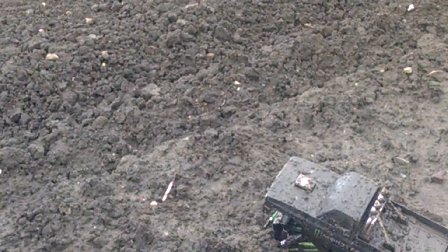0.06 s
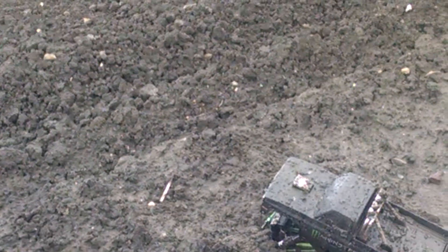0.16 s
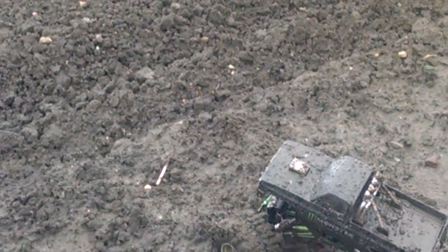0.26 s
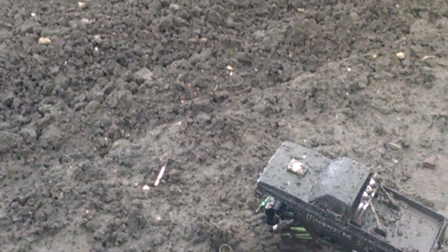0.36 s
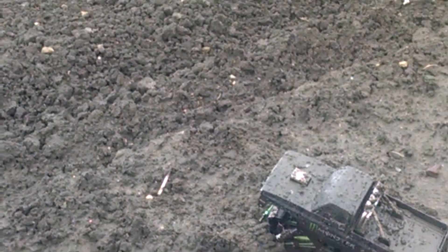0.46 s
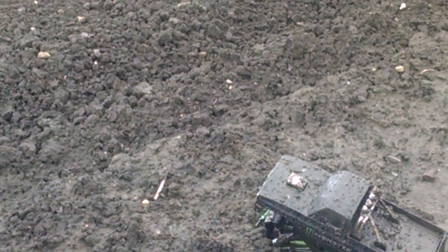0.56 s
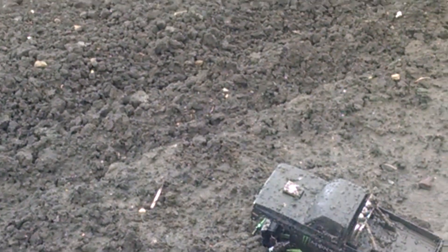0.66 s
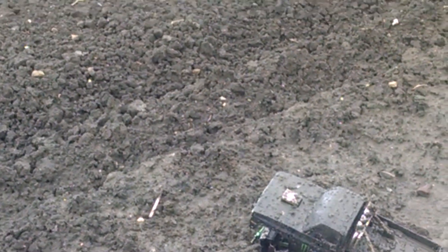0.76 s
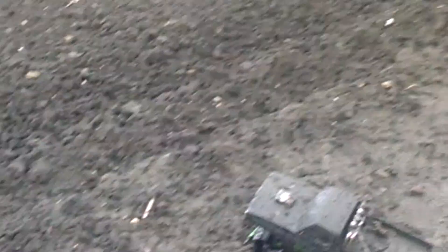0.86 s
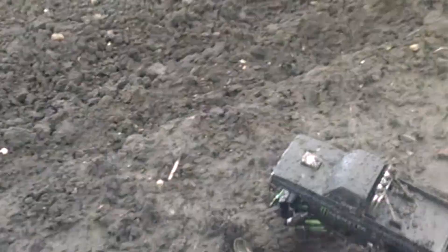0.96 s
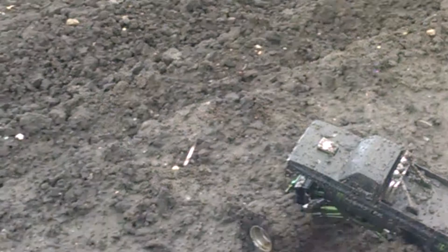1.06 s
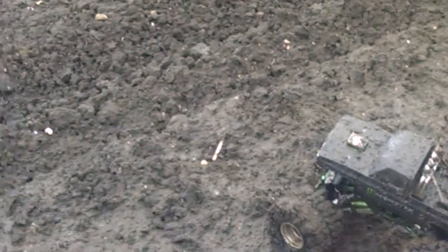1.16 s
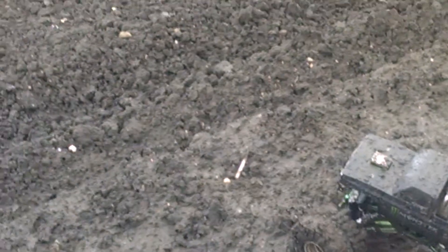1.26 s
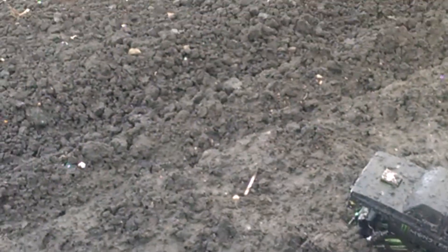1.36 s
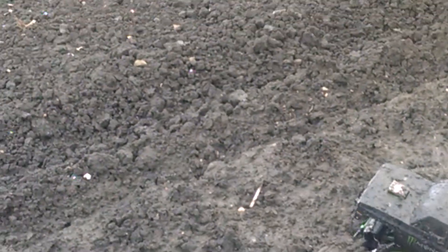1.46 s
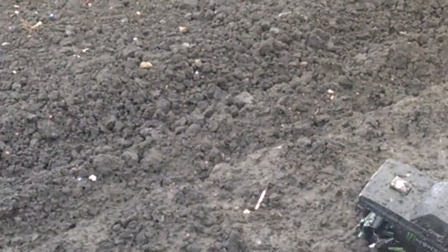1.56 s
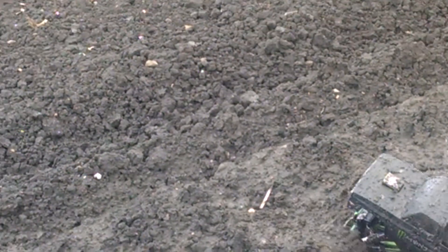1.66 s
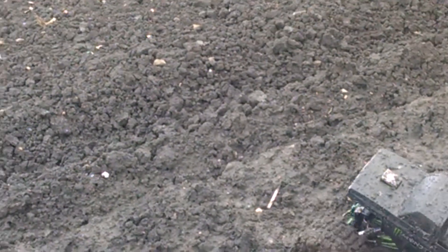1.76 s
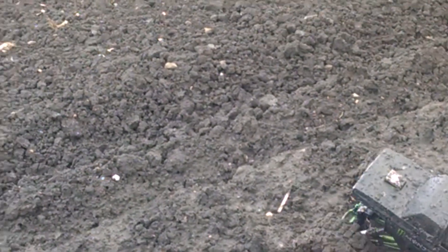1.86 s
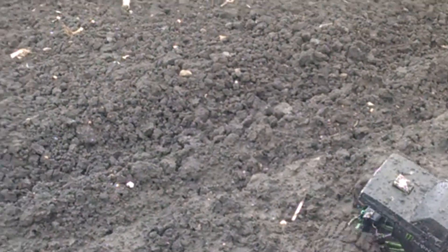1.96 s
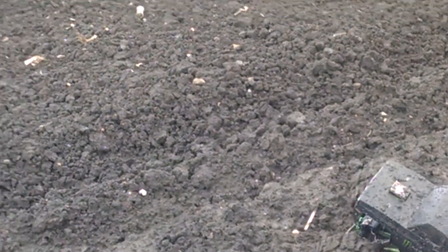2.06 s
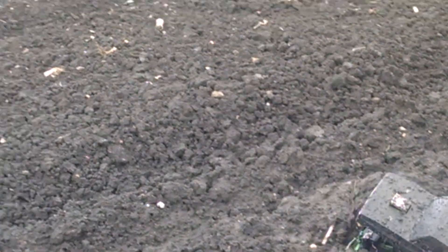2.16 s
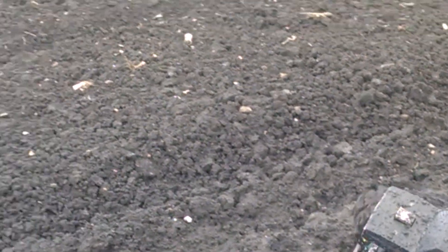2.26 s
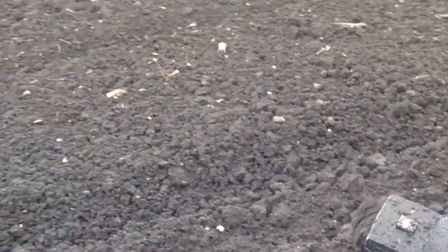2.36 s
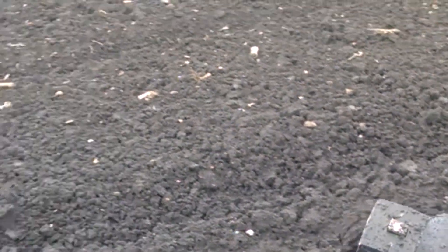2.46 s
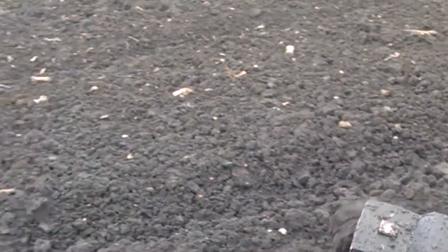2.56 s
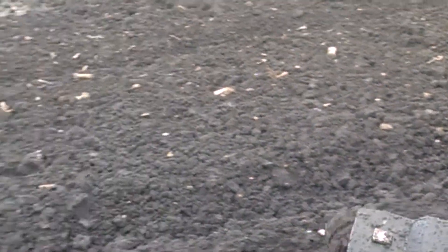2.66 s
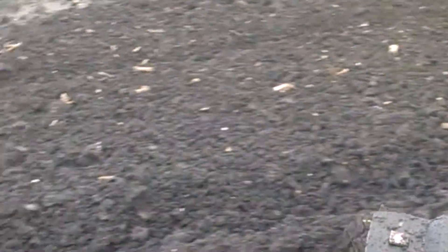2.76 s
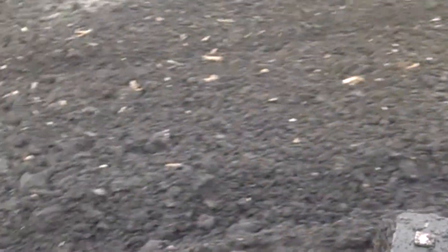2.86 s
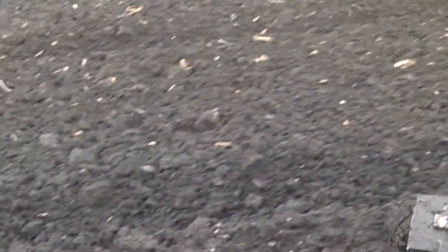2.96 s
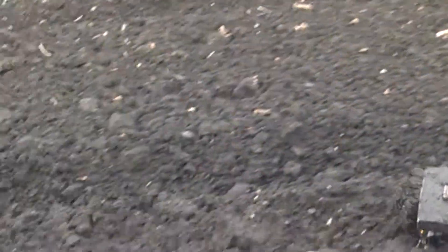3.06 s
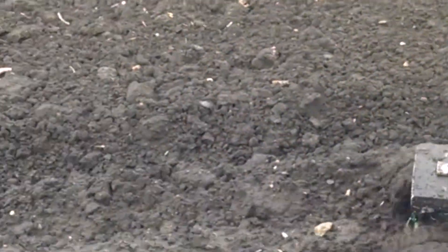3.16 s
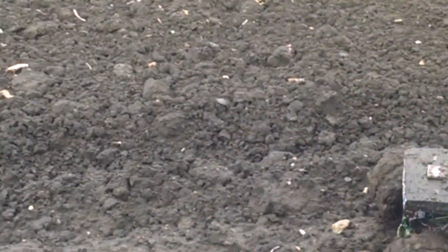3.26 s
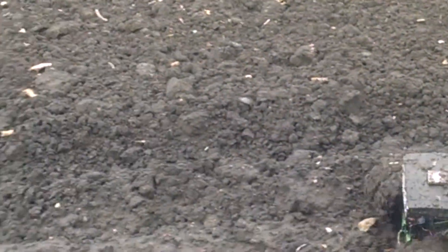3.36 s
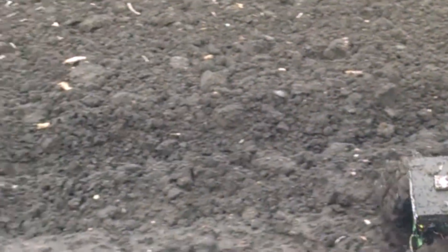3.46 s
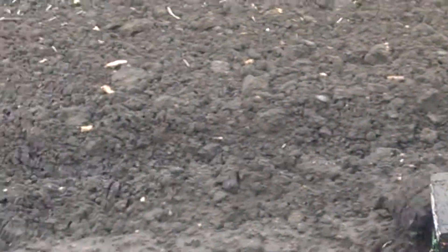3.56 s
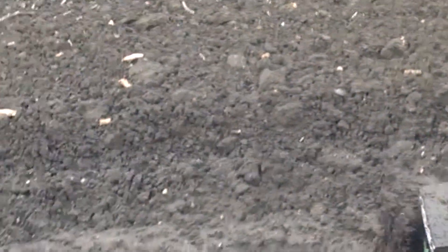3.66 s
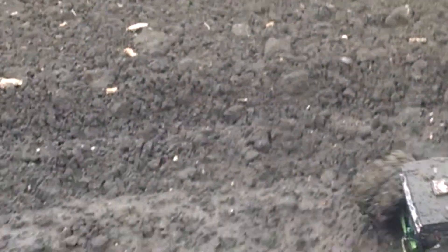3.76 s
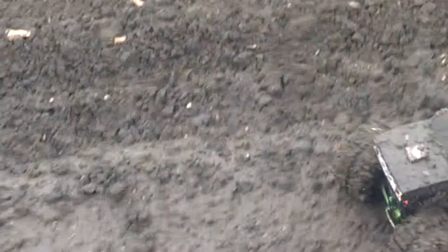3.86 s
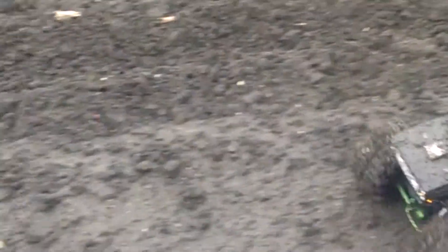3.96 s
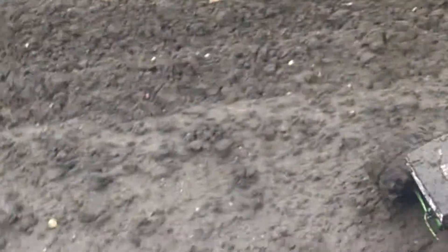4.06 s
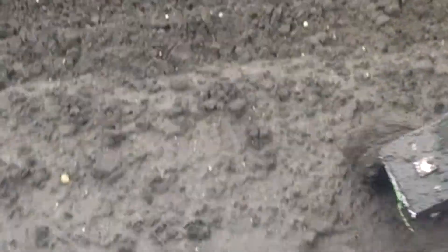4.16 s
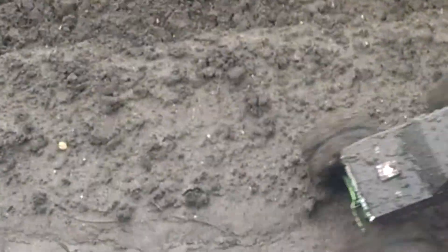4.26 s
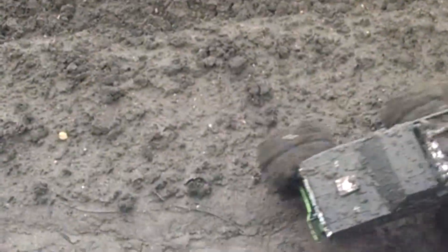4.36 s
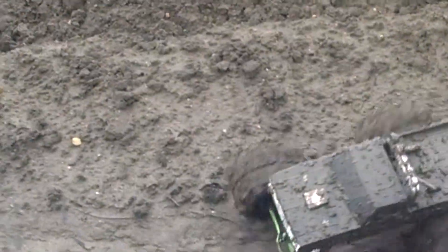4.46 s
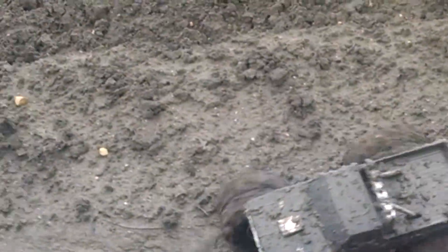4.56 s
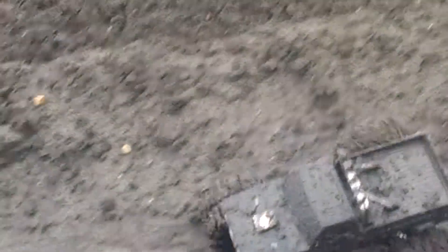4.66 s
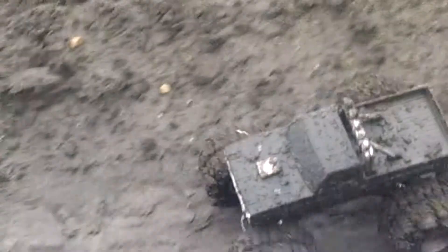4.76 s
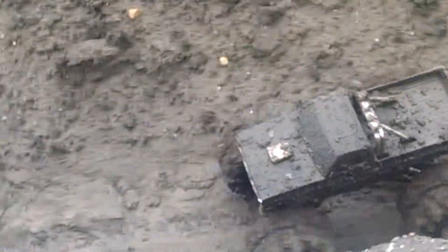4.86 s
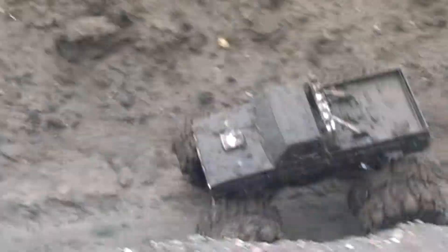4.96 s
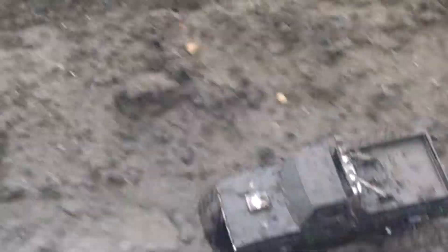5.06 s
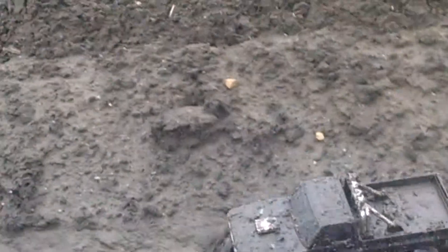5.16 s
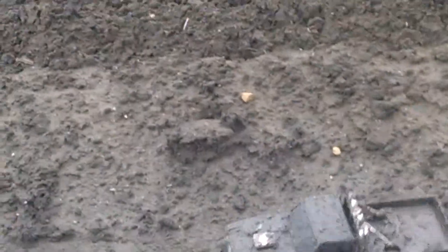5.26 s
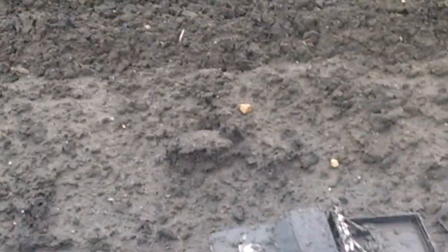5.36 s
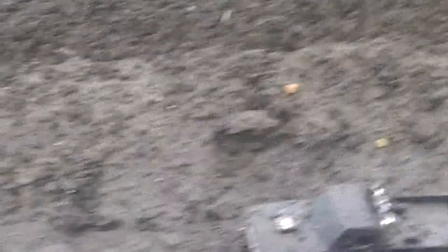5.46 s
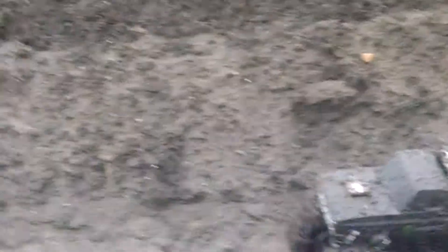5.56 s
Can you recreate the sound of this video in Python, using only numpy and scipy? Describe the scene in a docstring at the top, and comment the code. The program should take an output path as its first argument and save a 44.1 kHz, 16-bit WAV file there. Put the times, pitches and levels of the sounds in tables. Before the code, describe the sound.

Small electric motor and rattling plastic gears start up, climb to a rough shrill whine over crunching soil, then sag unsteadily.

```python
"""A toy truck stands on wet soil, then drives off close to a handheld stereo microphone.
Its gears whine and rattle: tones follow the gear pitch, and random clicks in noise are filtered into rattle.
Motor brushes hiss, the speed controller whistles, tyres crunch in the mud, and damped rings make clicks.
A servo chirps; wind rumble and pops reach the right capsule, over an open-air hush with a hum.
Each side has a delayed copy of the other taken off, then a limiter and a treble cut follow."""
import sys
import numpy as np
from scipy import signal
from scipy.fft import rfft, irfft, next_fast_len
from scipy.io import wavfile
from scipy.ndimage import uniform_filter1d

SR = 44100
rng = np.random.default_rng(int(sys.argv[2]) if len(sys.argv) > 2 else 0)


def file_out(sig):
    """Save sig as 16-bit WAV at sys.argv[1]."""
    # one column per channel
    cols = np.atleast_2d(sig).T
    # limit, then scale
    lim = np.clip(cols, -1, 1)
    pcm = np.round(lim * 32767).astype(np.int16)
    wavfile.write(sys.argv[1], SR, pcm)


N = 247401  # length in samples

# All levels are those going into the body, the limiter and the other steps further on.
# Pitch of the meshing gear teeth, dipping as the wheels bog and rising as they break free.
# Each row: time in seconds, pitch in Hz, then the levels of fundamental, octave and third partial in dB.
GEAR_PITCH = [(1.35, 483.0, -69, -79, -72.5), (1.4, 542.0, -75, -40, -66), (1.43, 485.0, -47, -59, -70.5),
              (1.46, 464.0, -54, -78, -68), (1.5, 460.0, -51, -69.5, -62), (1.55, 424.0, -66, -71.0, -52),
              (1.585, 466.0, -45.5, -64, -71), (1.62, 579.0, -53, -54, -44), (1.66, 437.0, -58, -68, -65),
              (1.7, 560.0, -57, -50, -63), (1.74, 529.0, -66, -50, -49), (1.78, 492.0, -42, -73, -51),
              (1.81, 485.0, -49, -74, -50), (1.854, 645.0, -35, -42, -43),
              (1.9, 652.0, -35.5, -39.5, -64.0), (1.94, 567.0, -43, -56, -48), (1.98, 625.0, -60, -55, -62),
              (2.02, 641.0, -36, -37, -65.5), (2.05, 753.0, -31, -56, -52.5),
              (2.1, 783.0, -37.5, -38, -64.5), (2.155, 840.0, -40.5, -36.5, -61.5),
              (2.185, 1151.0, -35, -49, -47), (2.216, 1060.0, -43, -52.5, -54),
              (2.24, 1284.0, -30.5, -53.0, -42), (2.29, 1270.0, -29, -57.5, -42),
              (2.335, 1330.0, -36, -48, -50), (2.376, 1510.0, -44, -37, -50),
              (2.415, 1450.0, -46, -33, -65.0), (2.44, 1440.0, -50, -46, -65.0),
              (2.465, 1540.0, -43, -46, -63.5), (2.5, 1570.0, -56, -38, -63.5),
              (2.53, 1500.0, -44, -35, -57.5), (2.562, 1380.0, -39, -35, -55),
              (2.584, 1078.0, -40, -48, -50), (2.636, 1140.0, -41.5, -58, -48.5),
              (2.668, 1400.0, -41.0, -44, -63.0), (2.685, 1200.0, -36, -48, -64.5),
              (2.71, 1216.0, -36.5, -44, -64.0), (2.758, 962.0, -43, -46, -55.5),
              (2.805, 1309.0, -39, -42, -56.0), (2.865, 1145.0, -39, -42, -55),
              (2.926, 1060.0, -39.5, -42, -36), (2.965, 924.0, -43, -46, -59.5),
              (3.0, 1076.0, -37.5, -42, -41), (3.02, 909.0, -44, -45, -58), (3.055, 995.0, -38, -42, -37),
              (3.086, 926.0, -45, -44, -57.5), (3.114, 1383.0, -36, -44, -50),
              (3.14, 1307.0, -35.5, -52, -53), (3.17, 874.0, -54, -48, -48), (3.2, 985.0, -43, -33, -46),
              (3.23, 859.0, -49, -45, -60.5), (3.27, 1025.0, -53, -34, -48.0),
              (3.31, 1000.0, -51, -36, -60.0), (3.336, 1090.0, -46.0, -34, -46),
              (3.358, 974.0, -48, -42, -40), (3.41, 947.0, -41.5, -40.5, -58.5),
              (3.46, 1341.0, -46, -29, -56), (3.5, 1031.0, -46, -50, -44), (3.53, 1223.0, -47, -52, -61.5),
              (3.58, 942.0, -38, -41, -58.0), (3.62, 1116.0, -51, -59, -57),
              (3.66, 1316.0, -47, -29, -41.5), (3.72, 1328.0, -46, -37, -41),
              (3.77, 1154.0, -45, -69.0, -36), (3.81, 1035.0, -67, -41, -41),
              (3.845, 1299.0, -46, -51, -45), (3.87, 1472.0, -41.5, -43, -50),
              (3.91, 1381.0, -57, -36, -67.0), (3.94, 1507.0, -42, -51, -63.5),
              (3.97, 1061.0, -51, -73.5, -43), (4.01, 1214.0, -43.5, -69.0, -53),
              (4.045, 1483.0, -49, -42, -65.0), (4.08, 1374.0, -45, -76, -71.5),
              (4.11, 1431.0, -60, -70.0, -64.5), (4.15, 1450.0, -45, -64.5, -64.0),
              (4.18, 1600.0, -52, -52, -52.0), (4.21, 1640.0, -52, -33, -40),
              (4.25, 2040.0, -37, -50, -60.0), (4.28, 1600.0, -50, -36, -52.5),
              (4.3, 1740.0, -48, -38, -62.5), (4.33, 1600.0, -50, -42, -63.0),
              (4.36, 1856.0, -57, -59, -52), (4.387, 2173.0, -42, -40, -37.0),
              (4.41, 1800.0, -43, -42, -50.0), (4.44, 1780.0, -44, -37, -61.0),
              (4.47, 1429.0, -50, -50, -61.0), (4.5, 1250.0, -43.5, -52.5, -62.5),
              (4.53, 1776.0, -70, -50, -51.0), (4.56, 1620.0, -65, -41, -64.5),
              (4.6, 1428.0, -44, -44, -74), (4.625, 1350.0, -55, -51, -57),
              (4.665, 1802.0, -49, -49.0, -39), (4.69, 1504.0, -41, -36, -61.0),
              (4.71, 1103.0, -53, -60.5, -55), (4.75, 1149.0, -50, -64.5, -64),
              (4.8, 1200.0, -62, -41, -44), (4.84, 1614.0, -42, -42.5, -37),
              (4.875, 1102.0, -45.5, -62.0, -48), (4.912, 1672.0, -61, -45, -58),
              (4.935, 1370.0, -33, -52, -51.5), (4.952, 1146.0, -42, -67, -57),
              (4.99, 1299.0, -73, -74, -63.5), (5.02, 955.0, -66.0, -41, -76),
              (5.05, 715.0, -37.5, -42.5, -71), (5.08, 922.0, -55, -48, -64.5),
              (5.12, 1133.0, -49, -47, -48), (5.145, 975.0, -41, -40, -60.5),
              (5.17, 786.0, -48, -55, -65.0), (5.2, 933.0, -42, -39, -64.5), (5.225, 1015.0, -47, -40, -57),
              (5.264, 647.0, -48, -58, -54), (5.3, 675.0, -41, -51.5, -49), (5.33, 685.0, -50, -46, -55),
              (5.37, 720.0, -60, -53.0, -57), (5.4, 650.0, -51, -68, -51), (5.43, 610.0, -41, -58, -42),
              (5.455, 640.0, -60, -50, -62.5), (5.48, 878.0, -49, -35.5, -57),
              (5.512, 588, -35.5, -49, -44), (5.535, 732.0, -48, -48, -46), (5.555, 770.0, -49, -41, -65),
              (5.585, 645.0, -46, -42, -47), (5.61, 703.0, -44, -50, -46)]
INERTIA_S = .012  # the pitch is averaged over this time
# While the wheels lack grip, two more gear trains hunt about the first at random.
# Each row: time in seconds, distance as a share of the pitch, level in dB against the first.
HUNTING_TRAINS = [(1.35, .25, -5), (1.8, .25, -6), (1.85, .05, -24), (3.7, .05, -24), (3.85, .2, -10),
                  (4.1, .2, -5), (5.0, .2, -5), (5.15, .22, -12), (5.3, .2, -15), (5.61, .15, -15)]
# Upper partials of the mesh, a growl at low speed. Each row: time in seconds, level in dB.
GROWL_LEVEL = [(1.35, -57), (1.4, -52), (1.48, -61), (1.53, -54), (1.7, -55), (1.87, -51), (2.0, -52),
               (2.12, -58), (2.25, -75), (5.0, -75), (5.15, -58), (5.61, -57)]
# Each entry: growl pitch as a multiple of the mesh pitch.
GROWL_MULTIPLES = (2.5, 3.5, 4, 5, 6, 7)
OVERTONE_FLICKER_DB = 4
DULL_HZ, DULL_WIDTH_HZ, DULL_DB = 2450, 280, -10  # the shell passes little of the overtones here
# Rough tones about where the gear case rings. Each entry: pitch in Hz.
STRAND_PITCHES = (1900, 2950, 3050, 3180, 3300, 3450, 3600, 3800, 4000)
STRAND_DB, STRAND_WANDER = -14, .045  # dB against the rattle; share of the pitch

# Motor effort, heard as brush hiss. Each row: time in seconds, level in dB.
EFFORT = [(1.32, -117), (1.334, -48.5), (1.396, -37), (1.485, -53), (1.528, -39.5), (1.585, -45.5),
          (1.72, -41.5), (1.82, -41), (1.87, -36), (1.97, -40.5), (2.01, -38), (2.14, -34), (2.35, -29),
          (2.55, -31), (2.61, -36), (2.68, -34), (3.09, -32.5), (3.115, -26.5), (3.17, -32.5), (3.6, -31.5),
          (4.05, -29.5), (4.1, -36), (4.126, -23.5), (4.16, -31), (4.19, -27), (4.36, -28), (4.392, -26.5),
          (4.47, -28.5), (4.67, -29), (4.815, -32.5), (4.84, -25.5), (4.876, -30), (4.932, -26.5),
          (4.96, -31.5), (5.01, -29), (5.058, -36.5), (5.11, -28), (5.176, -36), (5.206, -30.5),
          (5.3, -40.5), (5.35, -36), (5.45, -42), (5.478, -34), (5.506, -40.5), (5.55, -36.5), (5.61, -42)]
# Slow levels of the grinding. Each row: time in seconds, gear rattle in dB, tyre crunch in dB.
GRIND_LEVELS = [(1.33, -42, -48), (1.6, -43.5, -52), (1.9, -38.5, -42.5), (2.1, -32.5, -39),
                (2.4, -37, -44), (3.0, -35, -43), (3.6, -36.5, -41.5), (4.1, -43.5, -40.5),
                (4.45, -38, -37.5), (5.0, -37.5, -45), (5.3, -38.5, -44.5), (5.61, -42.5, -45)]
# Quick swings of effort, against its running mean, carry over to rattle and crunch by these shares.
EFFORT_MEAN_S, RATTLE_FOLLOWS, CRUNCH_FOLLOWS = 0.45, 0.67, 0.31
CRUNCH_LUMPY_DB = 1.2
# Tyres break through clods. Each row: time in seconds, rise over the crunch in dB.
CLOD_BURSTS = [(2.366, 8.5), (3.129, 7), (3.41, 4), (3.583, 10.5), (3.777, 9.5), (4.363, 1), (4.67, 0),
               (5.127, 8)]
CLOD_S = .01
FIZZ_S, FIZZ_DB, FIZZ_T60_S = .856, -55, 0.4  # start, level, time to fall by 60 dB

# Tone colour of the noises. Each row: frequency in Hz, relative level per hertz in dB.
GEAR_COLOUR = [(700, -18.5), (1000, -6), (1500, -4.5), (2000, -6.5), (2500, 13), (3200, -1), (4000, -24),
               (5000, -0.5)]
BRUSH_COLOUR = [(4000, -0.5), (5000, 0), (6300, 1.5), (8000, -2), (10000, 5.5), (13000, 4.5), (15500, 5)]
TYRE_COLOUR = [(120, -12), (250, 7.5), (400, 5.5), (650, 0.5), (1000, -7.5)]
AIR_COLOUR = [(90, 15), (200, 5), (350, 3.5), (500, -7), (1100, -7), (2100, -10.5), (3300, -10), (5500, -8),
              (9000, -10.5), (15000, -11.5)]
# Body resonances. Each row: frequency in Hz, width in Hz, gain of the added ring in dB.
BODY_RINGS = [(3495, 370, -1.5), (5040, 188, 11), (7480, 550, 11.5)]
# How alike the noise is at both capsules. Each row: frequency in Hz, likeness (1 means the same).
LIKENESS = [(200, 0.99), (1000, 1), (2000, 0.94), (4000, 0.017), (6000, 0.012), (9000, 0.11),
            (14000, 0.032)]
# Left against right. Each row: frequency in Hz, left minus right in dB.
LEFT_LEAN = [(300, 0.5), (600, -3.5), (1200, -4), (2200, 4.5), (4200, -6.5), (8000, 7.5), (15000, -6)]
SURGE_DB, PATCHY_DB = .8, 1.5  # flicker of all bands together, and of each band alone

CREEP_HZ, CRUISE_HZ = 5804, 5745  # the controller's chopping at part throttle, and under way
# Part throttle. Each row: start in seconds, end in seconds, tone level in dB, half-pitch level in dB.
CREEP_SPELLS = [(1.416, 1.897, -38.5, -46.5), (5.463, 5.7, -42, -69)]
# Under way. Each row: time in seconds, tone level in dB, octave level in dB.
CRUISE_LEVELS = [(1.87, -42.5, -64), (2.0, -41, -65), (2.13, -43, -69), (2.2, -36, -62), (2.4, -38.5, -65),
                 (2.6, -47, -55), (2.82, -37, -42), (2.9, -45, -48), (3.12, -47, -42), (3.25, -33, -53),
                 (3.42, -44.5, -45), (3.6, -42, -41), (3.75, -39.5, -46), (3.95, -46, -44),
                 (4.05, -47, -50), (4.4, -39, -62), (4.8, -54, -50), (5.1, -39, -63), (5.18, -46, -56),
                 (5.3, -36.5, -45), (5.47, -45, -69)]
SING_FLICKER_DB = 1.5

# Clicks of the truck and soil. Each row: start in seconds, level in dB, ring pitch in Hz,
# ring time to fall by 60 dB in seconds, scuff over ring in dB, top of the scuff in Hz.
CLICK_EVENTS = [(0.046, -46, 494, 0.043, -9.5, 1500), (0.502, -50, 510, 0.038, -9, 1500),
                (0.511, -57, 900, 0.033, 0, 1600), (0.522, -59, 1300, .025, -3, 1700),
                (0.708, -41.5, 483, 0.037, -9, 1800), (0.712, -44.5, 990, 0.045, -10, 3000),
                (0.786, -37, 560, 0.021, -22.5, 1000), (0.841, -43.5, 290, 0.058, 0.5, 7000),
                (0.857, -38, 1390, 0.037, -4.5, 9000), (0.996, -63.5, 1630, .02, 6, 5000),
                (1.031, -28.5, 454, 0.025, -14, 6000), (1.242, -54.5, 1520, 0.022, 5.5, 2000),
                (1.336, -47, 490, 0.022, 11.5, 9200), (1.345, -48, 1260, 0.016, -15, 5000),
                (4.167, -19.5, 430, 0.027, -15.5, 1212), (5.134, -18.5, 550, 0.023, -20, 1198)]
# A buzzy chirp of the steering servo. Each row: time in seconds, pitch in Hz, level in dB.
SERVO_TWITCH = [(.868, 1560, -78), (.88, 1640, -60), (.9, 1600, -58), (.907, 1750, -70), (.913, 1960, -61),
                (.927, 1860, -60), (.94, 1800, -70), (.96, 1780, -82)]
# Each entry: level of the next partial in dB against the chirp's level.
SERVO_OVERTONES = [-14, -3, -5, 1, 1, -4]

# Single pops off the beat, from faint to very loud. Each row: time in seconds, peak in dB.
SINGLE_POPS = [(1.033, -29), (2.030, 0.5), (2.752, -28), (3.19, -33), (4.03, -25), (5.168, -22)]
POP_RISE_S, POP_FALL_S = .0004, .0014
# Regular pops come at a steady beat and grow to a plateau.
BEAT_FIRST_S, BEAT_S = 1.394, .31985
BEAT_DB, BEAT_START_DB, BEAT_GROWS_DB_S, BEAT_UNEVEN_DB = -23, -51, 18, 1
# Wind rumble. Each entry: band edge in Hz.
WIND_BAND = (36, 58.3)
BREEZE_DB, BREEZE_ONSET_DB_S = -52.5, 5  # rises at this rate until 1 s, then stays
# Each row: time of the gust's peak in seconds, peak in dB, slope either side in dB per second.
WIND_GUSTS = [(.8, -53, 40.3), (1.38, -45.5, 40.3), (2.04, -27.5, 75), (2.75, -48, 87), (2.98, -65, 59.5),
              (3.22, -35, 70.4), (4.03, -46, 59.4), (4.551, -46, 81), (5.36, -46, 80)]

# The background level rises as the recorder's gain opens. Each row: time in seconds, level in dB.
BACKGROUND_LEVEL = [(0, -64.5), (.6, -61.5), (1.3, -55), (2, -49), (5.61, -45)]
# A distant motor hum drifts, mostly upward. Each row: time in seconds, pitch in Hz.
HUM_PITCH = [(0, 243.2), (2.2, 242.3), (2.7, 252), (4, 264.3), (4.8, 266.2), (5.61, 262.7)]
HUM_DB, THIN_TONE_HZ, THIN_TONE_DB = -2.5, 1716, -17  # levels against the background

LEFT_LEAD_S, CROSS_LAG_S = .00007, .000396
CROSS_GAIN, CROSS_CUT_HZ = 0.75, 7000  # the cut is for the copy of the left only
LIMIT_DB, RELEASE_DB_S, CUTOFF_HZ = -9.5, 23.5, 15520


def from_db(db):
    """Turn decibels into gain."""
    return 10 ** (np.asarray(db) / 20)


def rms_one(x):
    """Scale to an rms (average strength) of 1."""
    return x / np.sqrt(np.mean(x ** 2) + 1e-20)


def in_time(rows, outside=None):
    """Draw straight lines between a table's rows: one curve a column, one value a sample."""
    s, *columns = np.transpose(np.vstack(rows))
    return [np.interp(np.arange(N) / SR, s, c, outside, outside) for c in columns]


def at_hz(points, hz):
    """Read a frequency table on a log-frequency axis."""
    return np.interp(np.log(hz), np.log(np.array(points)[:, 0]), np.array(points)[:, 1])


def drift(rate):
    """Smooth random wandering with spread 1; a higher rate in Hz wanders faster."""
    r = np.exp(-80 * np.pi * rate / SR)  # made at one value per 40 samples
    noise = rng.standard_normal(N // 40 + 2002)
    slow = signal.lfilter([1], [1, -2 * r, r * r], noise)[2000:]
    return np.interp(np.arange(N) / 40, np.arange(len(slow)), rms_one(slow))


def grains(per_s, spread_db):
    """Four streams of random clicks of uneven size on a bed of noise."""
    shape = (2, 2, N)
    size_db = spread_db * np.minimum(rng.exponential(1, shape), 4)
    sizes = from_db(size_db) * rng.standard_normal(shape)
    ticks = sizes * (rng.random(shape) < per_s / SR)
    return rms_one(ticks) + rng.standard_normal(shape)


def spread(streams, spectrum):
    """Third-octave bands on two capsules, each with its level, flicker, likeness and lean; rms 1."""
    out, together = 0, drift(25)
    lowest, highest = spectrum[0][0], spectrum[-1][0]
    edges = lowest * 2 ** np.arange(-1 / 6, np.log2(highest / lowest) + .4, 1 / 3)
    for k, (low, high) in enumerate(zip(edges, edges[1:])):
        band = signal.butter(2, [low, high], "band", fs=SR, output="sos")
        mid, side = signal.sosfilt(band, streams[k % 2])  # neighbouring bands use different noise
        hz = np.sqrt(low * high)
        alike = np.clip(at_hz(LIKENESS, hz), -1, 1)
        flicker_db = SURGE_DB * together + PATCHY_DB * drift(14)
        lean = from_db(at_hz(LEFT_LEAN, hz) / 2 * np.array([[1], [-1]]))
        pair = np.sqrt(1 + alike) * mid + np.sqrt(1 - alike) * side * [[1], [-1]]
        out = out + from_db(at_hz(spectrum, hz) + flicker_db) * lean * pair
    return rms_one(out)


def tones(hz, levels_db, waver, rough):
    """A tone and its overtones; pitch wavers by a share, and fast chance smears higher lines more."""
    turns = 2 * np.pi * np.cumsum(hz * (1 + waver * drift(60))) / SR
    out = 0
    for k, db in enumerate(levels_db):
        share = min(rough * (k + 1) ** 2, .95)
        chance = drift(70 + 40 * k) + 1j * drift(70 + 40 * k)
        smear = np.sqrt(1 - share) + np.sqrt(share / 2) * chance
        out = out + np.sqrt(2) * from_db(db) * np.imag(smear * np.exp(1j * (k + 1) * turns))
    return out


def delayed(x, s, cut_hz=1e6):
    """A short delay of any length, with an optional treble roll-off."""
    size = next_fast_len(N + 64)
    hz = np.fft.rfftfreq(size, 1 / SR)
    shift = np.exp(-2j * np.pi * hz * s)
    return irfft(rfft(x, size) * shift / (1 + (hz / cut_hz) ** 4), size)[..., :N]


def gear_whine():
    """Teeth meet at a rate that follows the load on the wheels; other trains wander alongside."""
    mesh_hz, *partials_db = in_time(GEAR_PITCH)
    share, under_db = in_time(HUNTING_TRAINS)
    hz = uniform_filter1d(mesh_hz, round(INERTIA_S * SR))
    dull_db = [DULL_DB * np.exp(-((k * hz - DULL_HZ) / DULL_WIDTH_HZ) ** 2) for k in (1, 2, 3)]
    flicker_db = [1.8 * drift(35), OVERTONE_FLICKER_DB * drift(25), OVERTONE_FLICKER_DB * drift(25)]
    levels_db = np.sum([partials_db, dull_db, flicker_db], axis=0)
    out = tones(hz, levels_db, waver=.006, rough=.09)
    for k in GROWL_MULTIPLES:
        growl_db = in_time(GROWL_LEVEL)[0] + OVERTONE_FLICKER_DB * drift(25)
        out = out + tones(k * hz, [growl_db], waver=.015, rough=.7)
    mean_db = 20 * np.log10(uniform_filter1d(from_db(partials_db[0]), round(.15 * SR)))
    for side in (-1, 1):  # one train centred under the first, one over it
        level_db = mean_db + under_db + 4 * drift(22)
        train_hz = hz * (1 + share * (side + .6 * np.tanh(drift(12))))
        out = out + tones(train_hz, [level_db, level_db - 7], waver=.004, rough=.05)
    return (np.arange(N) / SR > GEAR_PITCH[0][0]) * out


def strands(rattle_db):
    """Short rough tones come and go, weaving about where the gear case rings."""
    out = 0
    for hz in STRAND_PITCHES:
        weaving_hz = hz * (1 + STRAND_WANDER * drift(10))
        level_db = rattle_db + STRAND_DB + 5 * np.tanh(drift(16))
        out = out + tones(weaving_hz, [level_db], waver=.004, rough=.2)
    return out


def drive_levels():
    """Hiss is the effort; rattle and crunch take a share of its quick swings; clods lift the crunch."""
    t = np.arange(N) / SR
    hiss_db, = in_time(EFFORT)
    mean_db = uniform_filter1d(np.maximum(hiss_db, -45), round(EFFORT_MEAN_S * SR))
    swing_db = hiss_db - mean_db
    rattle_db, crunch_db = in_time(GRIND_LEVELS)
    clods_db = sum(db * np.exp(-((t - s) / CLOD_S) ** 2) for s, db in CLOD_BURSTS)
    rattle_db = rattle_db + RATTLE_FOLLOWS * swing_db
    crunch_db = crunch_db + CRUNCH_FOLLOWS * swing_db + clods_db + CRUNCH_LUMPY_DB * drift(14)
    return hiss_db, rattle_db, crunch_db


def gear_rattle(rattle_db):
    """Random knocks in noise, coloured like the gears."""
    return from_db(rattle_db) * spread(grains(1500, 3.5), GEAR_COLOUR)


def brush_hiss(hiss_db):
    """Dense bright grains follow the motor effort; a crackling fizz starts once and dies away."""
    bright = spread(grains(6000, 4.25), BRUSH_COLOUR)
    since = np.arange(N) / SR - FIZZ_S
    fizz = (since > 0) * from_db(FIZZ_DB - 60 * np.maximum(since, 0) / FIZZ_T60_S)
    crackle = bright * from_db(2.5 * drift(70))
    return from_db(hiss_db) * bright + fizz * crackle


def body(x):
    """The plastic shell and gear case lift a few bands."""
    out = x
    for hz, width_hz, db in BODY_RINGS:
        r = np.exp(-np.pi * width_hz / SR)
        feed = [(1 - r * r) / 2, 0, (r * r - 1) / 2]
        back = [1, -2 * r * np.cos(2 * np.pi * hz / SR), r * r]
        out = out + from_db(db) * signal.lfilter(feed, back, x)
    return out


def tyre_crunch(crunch_db):
    """Sparser, lower grains for tyres in the mud."""
    return from_db(crunch_db) * spread(grains(600, 2.2), TYRE_COLOUR)


def controller():
    """Chopped motor current makes the windings sing at fixed pitches, mostly into the left capsule."""
    t, flicker = np.arange(N) / SR, from_db(SING_FLICKER_DB * drift(8))
    creep = 0
    for on, off, tone_db, half_db in CREEP_SPELLS:
        gate = np.clip(np.minimum(t - on, off - t) / .02, 0, 1)  # 20 ms fades
        creep = creep + gate * tones(CREEP_HZ / 2, [half_db, tone_db], waver=.0002, rough=.06)
    cruise_hz = CRUISE_HZ * (1 + .0007 * drift(3))
    cruise = tones(cruise_hz, in_time(CRUISE_LEVELS, outside=-120), waver=.0006, rough=.16)
    return flicker * (creep * from_db([[3.5], [-3]]) + cruise * from_db([[3], [-3]]))


def clicks():
    """A damped ring with a short noisy scuff on its front."""
    out, t = np.zeros(N + 4410), np.arange(4410) / SR
    noise = rng.standard_normal((len(CLICK_EVENTS), len(t)))
    scuff_fade = 2 * np.exp(-t / 0.0008) + 0.55 * np.exp(-t / 0.005)
    for (s, db, hz, t60, scuff_db, top_hz), hiss in zip(CLICK_EVENTS, noise):
        ring_fade = from_db(-60 * t / max(t60, .005)) * (1 - np.exp(-t / 0.0011))
        ring = np.sin(2 * np.pi * hz * t) * ring_fade
        band = signal.butter(1, [250, top_hz], "band", fs=SR, output="sos")
        scuff = rms_one(signal.sosfilt(band, hiss)) * scuff_fade
        out[round(s * SR):][:len(t)] += from_db(db) * (ring + from_db(scuff_db) * scuff)
    return out[:N]


def servo():
    """One short twitch of the steering motor, a gliding tone with strong overtones."""
    hz, db = in_time(SERVO_TWITCH)
    start, end = SERVO_TWITCH[0][0], SERVO_TWITCH[-1][0]
    sounding = in_time([(start, 1), (end, 1)], outside=0)[0]
    return sounding * tones(hz, [db + rel_db for rel_db in SERVO_OVERTONES], waver=.01, rough=.03)


def right_pops():
    """One-sided pushes on the right capsule that rise fast and sag."""
    kicks, t = np.zeros(N), np.arange(900) / SR
    beat = np.arange(BEAT_FIRST_S, N / SR, BEAT_S)
    growing_db = np.minimum(BEAT_DB, BEAT_START_DB + BEAT_GROWS_DB_S * (beat - beat[0]))
    beat_db = growing_db + BEAT_UNEVEN_DB * rng.standard_normal(len(beat))
    for s, db in [*zip(beat, beat_db), *SINGLE_POPS]:
        kicks[round(s * SR)] = -from_db(db)
    push = (1 - np.exp(-t / POP_RISE_S)) ** 2 * np.exp(-t / POP_FALL_S)
    return signal.fftconvolve(kicks, push / push.max())[:N]


def right_wind():
    """Wind on the right capsule: lumpy low rumble under a breeze and gusts."""
    t = np.arange(N) / SR
    band = signal.butter(1, WIND_BAND, "band", fs=SR, output="sos")
    rumble = signal.sosfilt(band, rng.standard_normal(N))
    rumble = signal.sosfilt(signal.butter(1, 160, fs=SR, output="sos"), rumble)
    rumble = rumble * from_db(2.5 * drift(12))
    breeze = from_db(BREEZE_DB + BREEZE_ONSET_DB_S * np.minimum(t - 1, 0))
    gusts = sum(from_db(db - slope * np.abs(t - s)) for s, db, slope in WIND_GUSTS)
    return (breeze + gusts) * rms_one(rumble)


def background():
    """Open-air hush with a low hum and a thin steady tone."""
    hush = spread(rng.standard_normal((2, 2, N)), AIR_COLOUR)
    hum = tones(in_time(HUM_PITCH)[0], [HUM_DB], waver=.004, rough=.05)
    thin = tones(THIN_TONE_HZ, [THIN_TONE_DB], waver=.0004, rough=.03)
    return from_db(in_time(BACKGROUND_LEVEL)[0]) * (hush + hum + thin)


def scene():
    """Add up the sound at the left and right capsules."""
    hiss_db, rattle_db, crunch_db = drive_levels()
    gears = gear_whine() + strands(rattle_db)
    truck = body(gear_rattle(rattle_db) + brush_hiss(hiss_db))
    near = gears + truck + tyre_crunch(crunch_db) + controller() + clicks() + servo() + background()
    right = delayed(near[1], LEFT_LEAD_S)  # the truck is nearer the left capsule
    return np.array([near[0], right + right_pops() + right_wind()])


def record(dry):
    """Each side loses a delayed copy of the other; a limiter ducks after loud peaks; the top is cut."""
    late = [delayed(dry[1], CROSS_LAG_S), delayed(dry[0], CROSS_LAG_S, CROSS_CUT_HZ)]
    wide = dry - CROSS_GAIN * np.array(late)
    over_db = np.maximum(20 * np.log10(np.abs(wide).max(axis=0) + 1e-9) - LIMIT_DB, 0)
    ramp_db = RELEASE_DB_S * np.arange(N) / SR
    # jumps up at each peak, then lets go at a steady rate
    duck_db = np.maximum(np.maximum.accumulate(over_db + ramp_db) - ramp_db, 0)
    duck_db = signal.lfilter([.007], [1, -.993], duck_db)  # smoothed, so it lags the peak
    out = np.clip(wide * from_db(-duck_db), -1, 1)
    return signal.sosfilt(signal.ellip(12, .5, 70, CUTOFF_HZ, fs=SR, output="sos"), out)


dry = scene()
out = record(dry)
file_out(out)
```